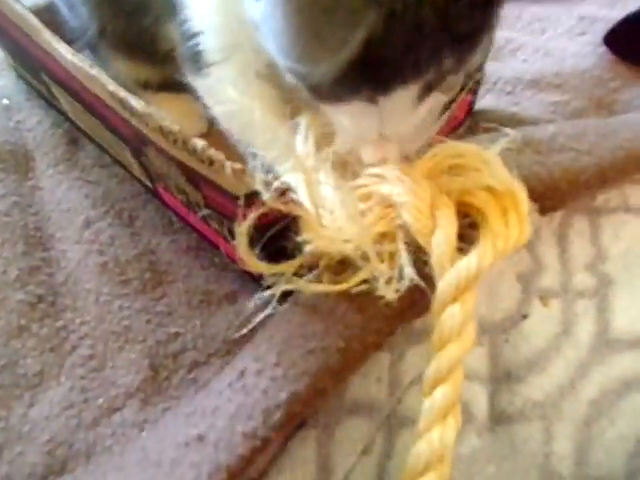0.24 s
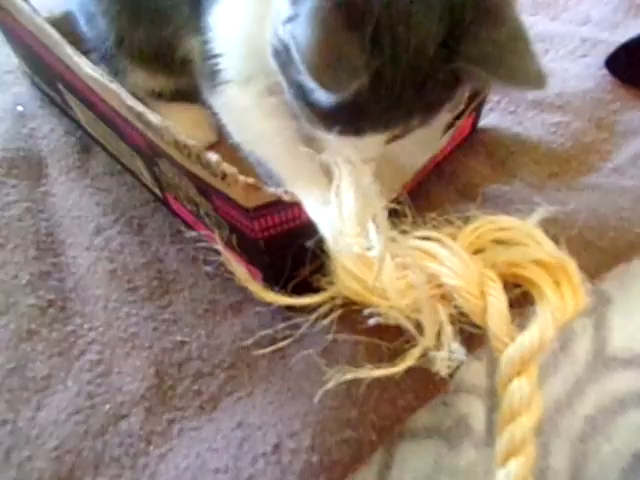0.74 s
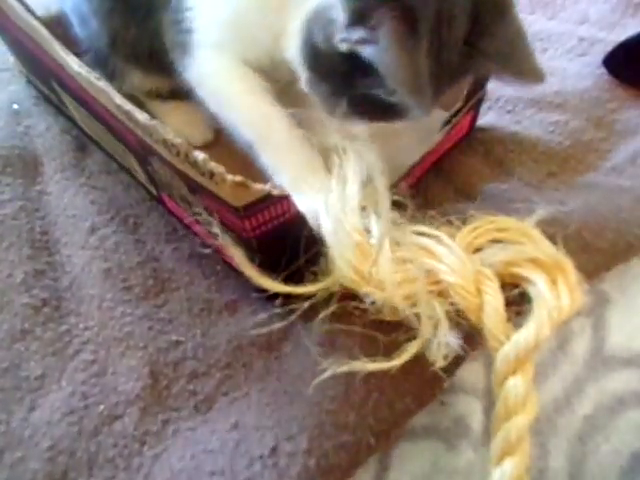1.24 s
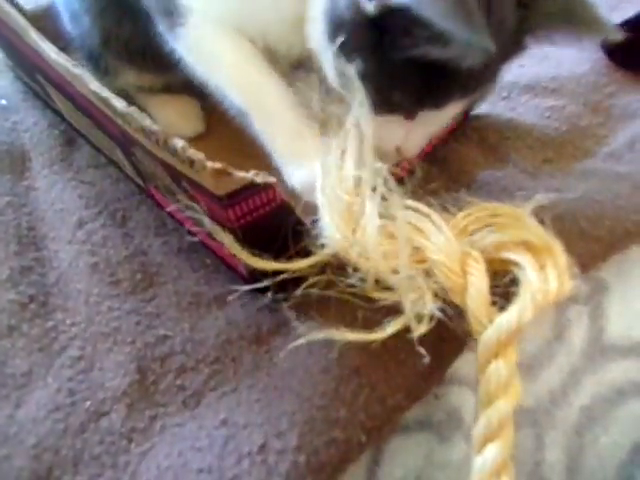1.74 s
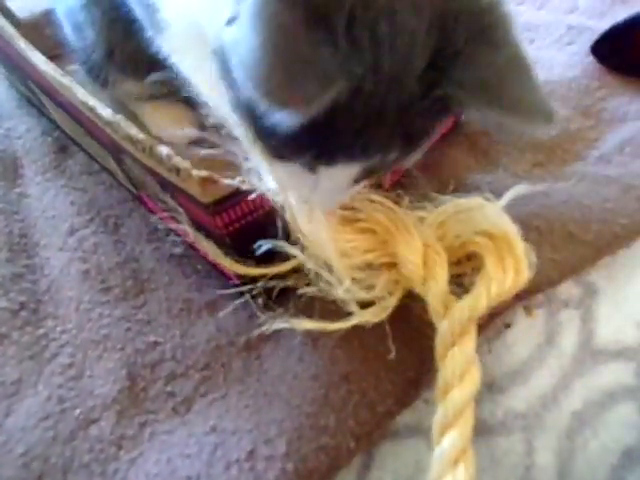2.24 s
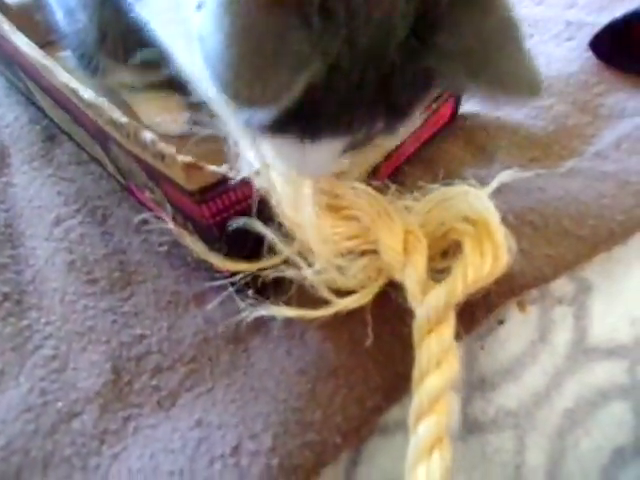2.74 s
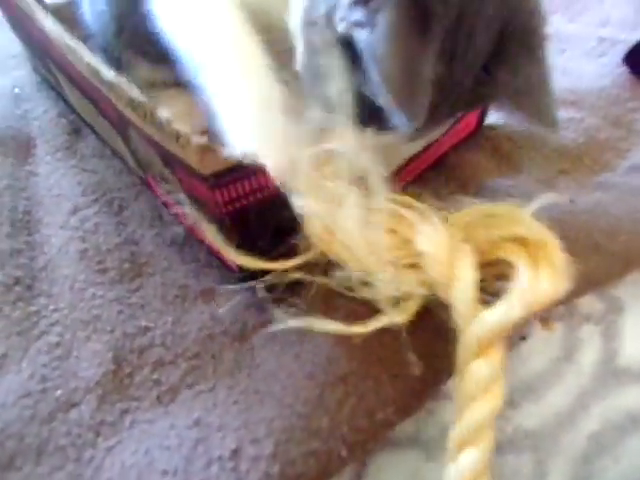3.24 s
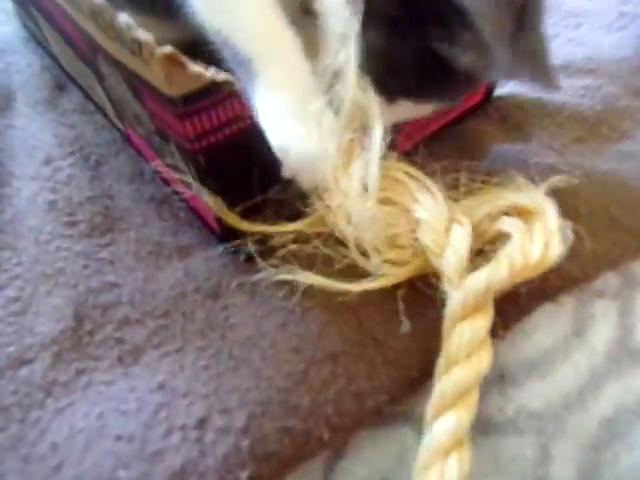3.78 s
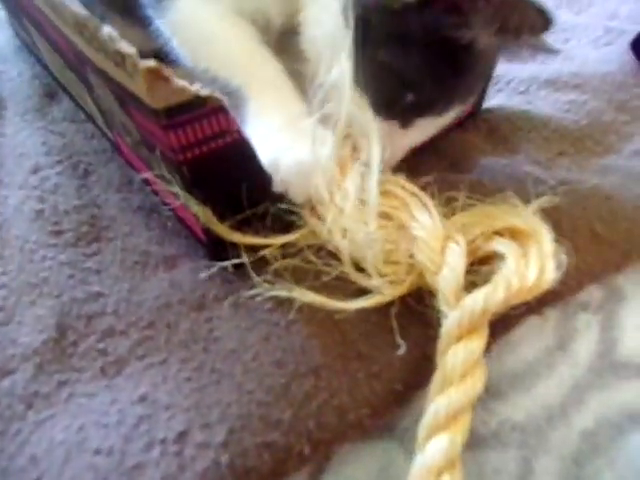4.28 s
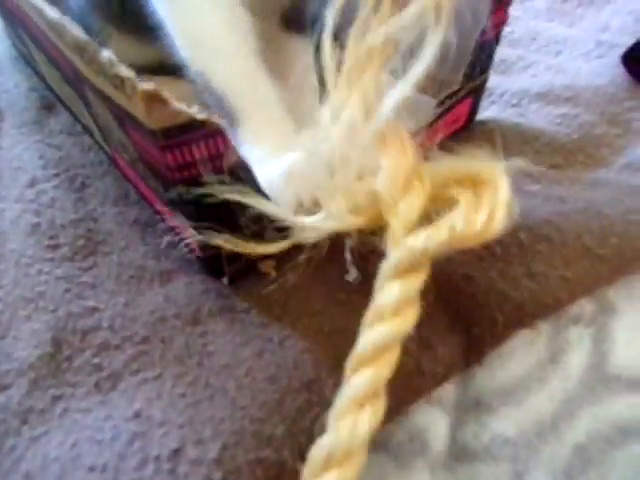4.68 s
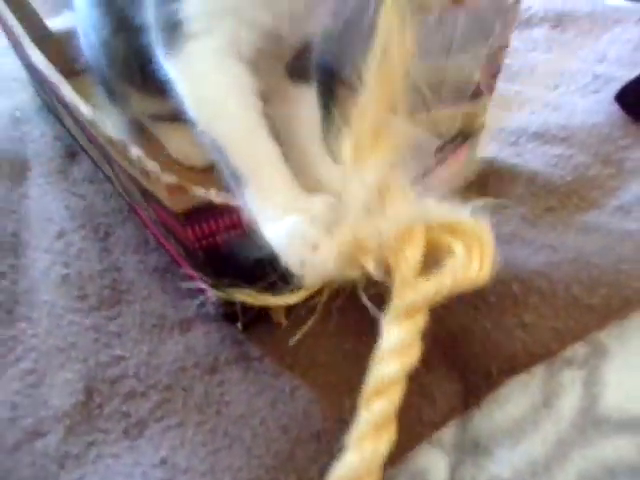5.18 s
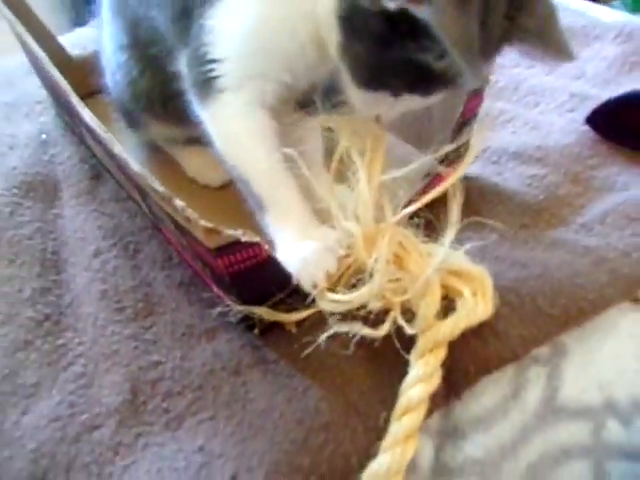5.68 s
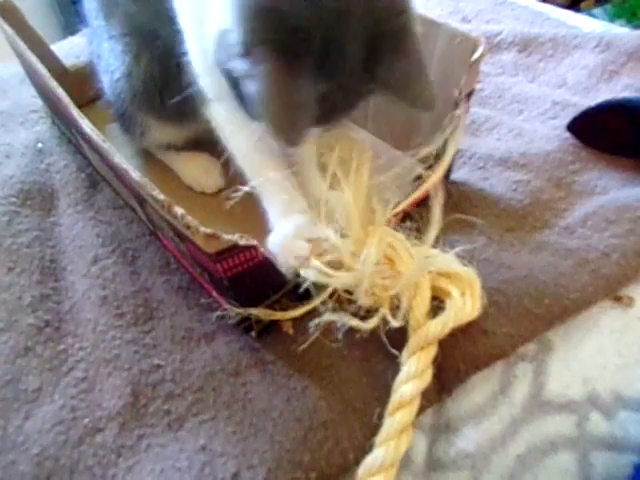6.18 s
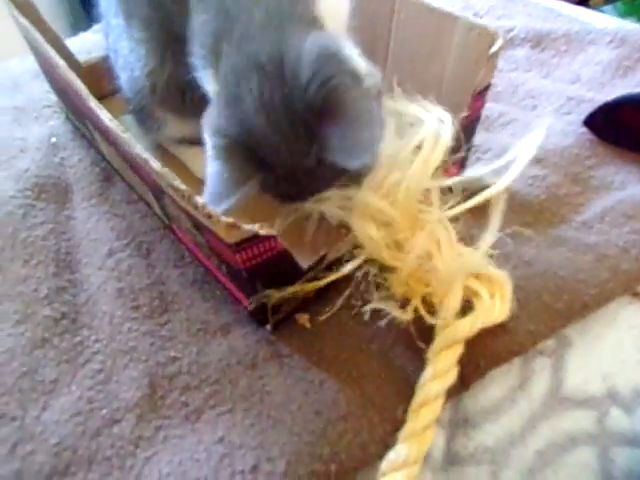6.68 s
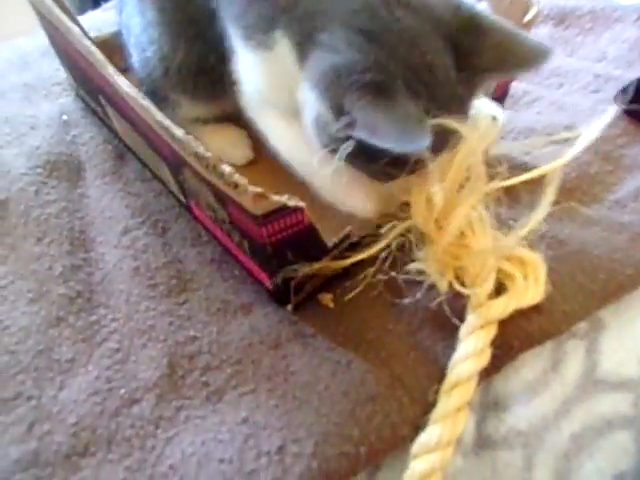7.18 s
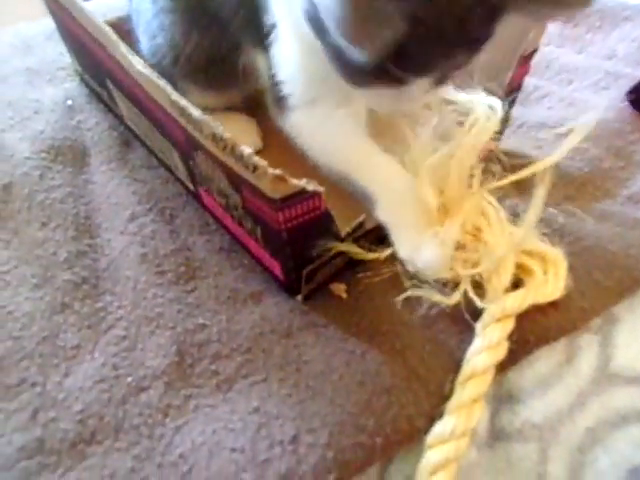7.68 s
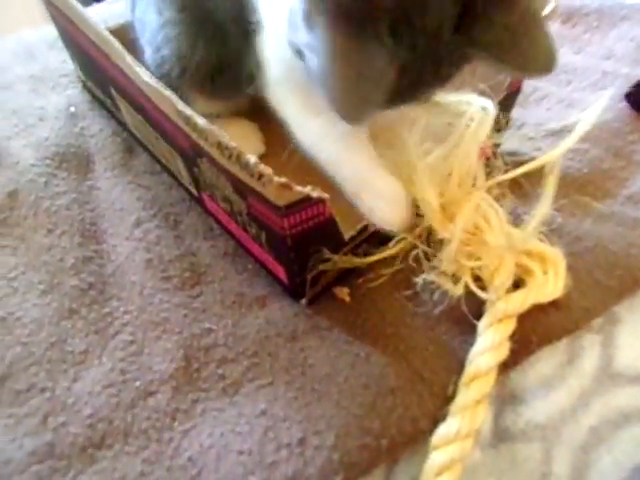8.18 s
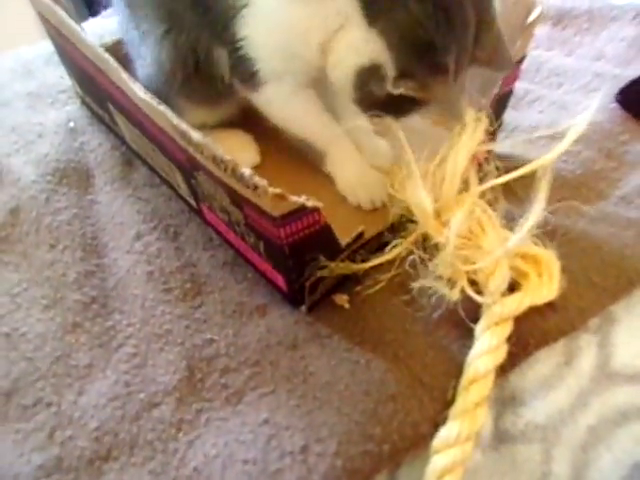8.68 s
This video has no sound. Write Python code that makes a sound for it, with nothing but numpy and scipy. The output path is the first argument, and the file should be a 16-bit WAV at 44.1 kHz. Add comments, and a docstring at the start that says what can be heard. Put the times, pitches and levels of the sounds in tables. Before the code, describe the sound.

A kitten gnaws and claws frayed rope in a cardboard box, dry rustles and crisp snaps over a steady low appliance hum.

```python
"""A kitten chews and claws a frayed plastic rope in a cardboard box, close to a small microphone.
Rope: grainy noise under stroke envelopes, pops and bright snaps; rips rasp through resonances.
Box: claw ticks as damped rings, knocks as a crack plus panel modes, all with a short room tail.
Background: faint thin high tones, a beating appliance hum with two faint tones, coloured air noise."""
import sys
import numpy as np
from scipy import signal
from scipy.fft import rfft, irfft, next_fast_len
from scipy.io import wavfile
from scipy.ndimage import map_coordinates

SR = 44100
rng = np.random.default_rng(int(sys.argv[2]) if len(sys.argv) > 2 else 0)


def wrap_up_sound(samples):
    """Save the sound to the file named by the first command line argument, as 16-bit audio."""
    columns = np.atleast_2d(samples).T
    # keep every value between -1 and 1, then stretch to whole-number steps
    tamed = np.clip(columns, -1, 1)
    steps = np.round(tamed * 32767).astype(np.int16)
    wavfile.write(sys.argv[1], SR, steps)


N = 393797

# Event levels are nominal: snaps, ticks, cracks and thuds add a fixed offset.
# strokes of teeth and paws: peak t/s, rise/s, fall/s (each per 20 dB), fibre level/dB, cardboard level/dB,
# top band re fibre/dB
STROKES = [(0.0, .1, 0.15, -72.5, -65.5, -5.5), (0.32, 0.074, 0.12, -66, -60.5, -13),
           (0.37, .1, 0.082, -65, -72, 2), (0.44, .03, 0.022, -70, -71, 8), (0.58, .02, 0.17, -88, -69, -6),
           (0.87, 0.022, 0.057, -66.5, -66, -8.5), (0.85, .5, 0.39, -75.5, -73, -3),
           (1.2, 0.16, 0.074, -63.5, -66, -6), (1.34, 0.085, 0.1, -63.5, -60, -5),
           (1.539, 0.053, 0.11, -53.5, -55.5, -12.5), (1.75, 0.29, 0.69, -66.5, -69.5, -6),
           (1.79, 0.079, 0.13, -57, -56.5, -9), (1.97, .05, 0.0073, -70, -66.5, -7),
           (2.42, 0.47, 0.05, -67.5, -65, -3), (3.06, 1.6, .1, -73, -72.5, -8),
           (3.13, 0.079, 0.22, -59.5, -62.5, -6), (3.185, 0.26, 0.042, -61.5, -62.5, -3.5),
           (3.29, 0.12, 0.1, -56.5, -57.5, -4.5), (3.358, 0.47, 0.018, -58, -58.5, -3),
           (3.561, 0.1, 0.05, -49.5, -49, -6), (3.63, .1, 0.084, -54, -51, -8),
           (3.69, 0.11, 0.64, -69, -64, -4.5), (3.89, .08, 0.12, -68, -62.5, -1.5),
           (4.11, 0.18, 1, -73.5, -67.5, -1), (4.56, 0.57, 0.049, -60, -63, -4.5),
           (4.62, 0.067, 0.19, -69.5, -71, -9), (4.93, 0.25, 0.24, -64, -66.5, -11),
           (5.12, 0.27, 1, -73.5, -67.5, -8), (5.761, 0.13, 0.23, -71, -67, -12),
           (5.879, 0.045, 0.063, -56.5, -54, -13), (6.01, 0.061, 0.074, -57.5, -56.5, -13),
           (6.1, 0.12, 0.58, -67, -63.5, -6), (6.289, 0.051, 0.092, -49.5, -50.5, -12),
           (6.42, 0.058, 0.12, -64, -78, 4.5), (6.474, 0.057, 0.062, -56, -46, -3),
           (6.54, .06, 0.04, -65.5, -70, 0), (6.61, .2, 0.12, -68.5, -77.5, -0.5),
           (6.7, 0.011, 0.067, -65.5, -70, -0.5), (6.96, 0.13, 0.26, -74, -58.5, -13),
           (7.3, 0.067, 0.057, -62.5, -71, 1.5), (7.81, 0.12, 0.18, -70, -68.5, -3),
           (8.09, 0.14, 1, -78.5, -77, 1), (8.3, 0.056, .03, -72, -62, -9),
           (8.321, 0.0079, 0.14, -65.5, -57.5, -11.5), (8.92, 0.047, .05, -79, -71, -10)]
REST_FIBRE_DB, REST_CARD_DB, REST_TOP_DB = -89, -71, -90.5
ROUNDNESS = 0.88  # exponent: 1 = pointed strokes, 2 = rounded
TOP_BAND_HZ = 11700  # lower edge of the top band
# rubbed-fibre colour: f/Hz, density/dB per Hz
FIBRE_COLOUR = [(1500, -44), (2500, -5), (3200, -2), (4400, -6), (5500, -5), (7400, -8), (8800, -2.5),
                (10200, -13.5), (11500, -13.5), (13500, -13.5), (16000, -14.5)]
# scraped-cardboard colour: f/Hz, density/dB per Hz
CARD_COLOUR = [(300, -4), (700, -2.5), (1400, -4.5), (2400, 1), (3300, -3), (5000, -25)]
# pop colours: f/Hz, width/Hz
POP_BANDS = [(5000, 2200), (9500, 2300), (14000, 5100)]
POPS_PER_S = 41  # in each band
POP_DB, POP_REF_DB = -10.5, -69.5  # pops re rustle, at this fibre gain
POPS_DROWN = 0.35  # exponent: pops grow less than the rustle as strokes strengthen

# fibre snaps: t/s, level/dB, cardboard share/dB
SNAPS = [(0.3431, -50, -10), (0.359, -42.5, -21), (1.155, -48, -2), (1.292, -51.5, 3), (1.503, -53, -6),
         (1.524, -54, -11), (1.5384, -48, -7), (1.548, -41, -4), (1.551, -43, -2), (1.558, -51, 0),
         (1.581, -59, -12), (1.593, -45, -7), (1.783, -43.5, 1), (1.786, -39, -7), (1.796, -57, -6),
         (1.811, -67, -5), (1.827, -55, -12), (1.9704, -43, -4), (2.0936, -54, -13), (2.28, -50, -16),
         (2.372, -54, -5), (2.9811, -52, -10), (3.0979, -49, -10), (3.142, -43, -24), (3.2261, -59, -10),
         (3.497, -43, -15), (3.5284, -34, -25), (3.7664, -48.5, -2), (3.834, -36.5, -35), (3.994, -49, -13),
         (4.011, -37, -42), (4.151, -51, -13), (4.526, -47, -10), (4.856, -52, -13), (4.881, -49, -7),
         (5.224, -43.5, -9), (5.8354, -42, -25), (5.8629, -44, -8), (5.9, -42.5, 1), (6.0993, -46, -3),
         (6.1934, -50, 4.5), (6.2725, -46, 2), (6.282, -40, -10), (6.299, -51, -5), (6.312, -46, -5),
         (6.34, -47, -9), (6.6141, -49.5, -14), (7.437, -57, -16), (8.387, -56, 8), (8.4085, -55, 0),
         (8.4446, -54, -16)]
SNAP_TOP_DB, SNAP_DULLING = 5, 0.593  # top band of a -49.5 dB snap; dB lost per dB of strength
THIN_HZ, THIN_HZ_PER_DB = 2500, 112.5  # lower edge of a snap; rises as the cardboard share falls

# claw ticks on cardboard: t/s, level/dB, f/Hz
TICKS = [(3.24, -48.5, 630), (3.5752, -36, 2200), (3.6004, -19.5, 1784), (6.4297, -33.5, 2600),
         (4.464, -44, 2450), (5.2427, -42.5, 3430), (5.244, -46, 2500), (6.0106, -31, 3270),
         (6.443, -24, 2620), (6.5077, -41.5, 2090), (6.5314, -41, 2100), (6.703, -41.5, 2620),
         (6.7148, -45, 2310), (6.916, -46, 2420), (6.9354, -43, 2720), (6.943, -45.5, 2700),
         (6.947, -50, 1350), (6.9568, -38.5, 2800), (6.958, -44, 2050), (6.976, -44, 2780),
         (6.998, -39, 2500), (7.0204, -44, 2550), (7.026, -46, 2500), (7.0308, -45.5, 2600),
         (7.041, -51.5, 2500), (7.0718, -53.5, 2270), (8.326, -45, 2640), (8.562, -38, 3330)]
TICK_CYCLES, TICK_SAG = 28, .006  # cycles per 60 dB fade; share of pitch lost per cycle
# a dragged claw chatters in small ticks; level and pitch are centres
SCRAPE_START_S, SCRAPE_END_S, SCRAPE_DB, SCRAPE_HZ = 6.93, 7.05, -55, 2500

# short rips, and at 6.934 s a dragged claw's rasp: t/s, level/dB, length/s, treble/dB, level change over the
# length/dB, # resonances of the torn part or scraped cardboard (f/Hz, width/Hz, level/dB)
RIPS = [(6.4335, -36, .021, -15.5, 0, [(930, 700, -9), (1890, 110, -8.5), (2540, 210, 2), (2780, 230, -16),
        (3980, 160, -10), (6770, 280, -12)]), (7.797, -70, .058, -14, -3, [(5080, 300, 0),
        (5800, 700, -3)]), (8.5595, -40, 0.043, -37, -6, [(656, 250, -12), (1100, 210, -7), (2420, 170, -4),
        (2800, 390, 7), (3330, 300, 6.5), (3850, 350, 1)]), (3.262, -63.5, 0.066, -30, 2, [(5300, 350, 0)]),
        (6.934, -60, .05, -30, -1, [(2780, 300, 0)]), (6.508, -51.5, 0.012, -23.5, -2, [(1210, 350, -1),
        (2130, 240, 0)])]
RIP_CYCLES, RIP_FADE_MIN_HZ = 150, 2500  # cycles per 60 dB fade, counted at this f or higher

# knocks on the box: t/s, crack/dB, body/dB, boom/dB
KNOCKS = [(0.57, -49, -59, -56), (1.539, -59.5, -64, -59), (3.229, -66, -67, -51), (3.255, -68, -61, -50.5),
          (3.5737, -22.5, -64, -42), (3.598, -7, -25, -33.5), (3.606, -23, -43, -54),
          (6.011, -47, -47.5, -48), (6.281, -62, -53, -56), (6.428, -37, -48, -48.5), (6.52, -61, -55, -56),
          (6.715, -68, -53.5, -55), (6.949, -62.5, -58, -59), (8.326, -39.5, -60, -65),
          (8.573, -58, -51, -76)]
# box panel modes: f/Hz, level/dB, t60/s
BOX_MODES = [(95, -19, 0.051), (135, -11, 0.18), (278.4, 5.5, 0.059), (356, -8, 0.18), (413, 2, 0.057),
             (494, -6, 0.055), (645, 3, 0.042), (763, 1.5, 0.043), (1000, -5.5, 0.08), (1124, -6.5, 0.073),
             (1272, -5.5, 0.084), (1376, -7.5, 0.048), (1660, -5.5, 0.038), (1776, -2.5, 0.032)]
BODY_LAG_S = .002  # panels ring just after the crack
# room echo decay: f/Hz, t60/s
ROOM_DECAY = [(200, 0.087), (1500, 0.23), (3500, 0.15), (8000, 0.12)]

# faint thin high tones: start t/s, end t/s, f/Hz, level/dB
THIN_TONES = [(0.0, 2.3, 6680, -90), (8.19, 8.33, 12850, -82), (8.21, 8.32, 8520, -86)]
# moments when hum and neighbour cancel most: t/s
BEAT_LOWS_S = [-0.35, 0.72, 1.85, 3.15, 4.19, 4.97, 6.05, 7.22, 8.17, 9.05]
HUM_HZ, HUM_DB, NEIGHBOUR_DB = 171.18, -49.5, -15  # neighbour level re hum
FLUTTER_HZ, FLUTTER_DB = 8.9, 0.36  # slight tremble of the hum
# fainter steady tones: f/Hz, level/dB, wander/Hz
TONES = [(340, -75.5, 0.58), (573.7, -71.5, 2.29)]
# room air and microphone hiss colour: f/Hz, density/dB per Hz
AIR_COLOUR = [(20, -21.5), (55, -1.5), (140, 1), (300, -2), (480, -11), (590, -6.5), (900, -10.5),
              (2600, -19.5), (4000, -16), (7000, -30.5), (10400, -58.5), (13000, -32), (15500, -26)]
AIR_DB = -63.5

# narrow dips in the microphone response: f/Hz, width/Hz, depth (0-1)
MIC_DIPS = [(3682, 150, .93), (4371, 220, .93), (8025, 600, .97), (11725, 700, .97), (16190, 500, .9)]
MIC_TOP_HZ = 15830


def rubbing():
    """Fibres slip over each other in grains and small pops; paws drag on the cardboard."""
    fibre_gain, card_gain, top_gain = strokes()
    rustle = unit(crackle(grain_db=3.0, rate=420, spikes=1.2) * amp(0.82 * wobble(36)))
    all_pops = unit(sum(pops(hz, width_hz) for hz, width_hz in POP_BANDS))
    pop_gain = amp(POP_DB) * (amp(POP_REF_DB) / fibre_gain) ** POPS_DROWN
    fibres = coloured(rustle + pop_gain * all_pops, FIBRE_COLOUR)
    top = filtered(fibres, lambda hz: hz > TOP_BAND_HZ)
    drag = unit(coloured(crackle(grain_db=1.5, rate=130, spikes=0.62), CARD_COLOUR))
    return fibre_gain * unit(fibres - top) + top_gain * unit(top) + card_gain * drag


def strokes():
    """Fibre, cardboard and top-band gains: stroke powers add to the resting level."""
    t = np.arange(0, N + 64, 64) / SR  # control rate: every 64 samples
    power = amp([[REST_FIBRE_DB], [REST_CARD_DB], [REST_TOP_DB]]) ** 2
    for peak_s, rise_s, fall_s, fibre_db, card_db, top_db in STROKES:
        distance = np.maximum((peak_s - t) / rise_s, (t - peak_s) / fall_s)
        shape_db = -20 * distance ** ROUNDNESS
        power = power + amp(shape_db + np.c_[[fibre_db, card_db, fibre_db + top_db]]) ** 2
    return [np.interp(np.arange(N) / SR, t, np.sqrt(p)) for p in power]


def crackle(grain_db, rate, spikes):
    """Noise whose level varies in short grains, with scattered single clicks."""
    clicks = (rng.random(N) < 250 / SR) * rng.exponential(spikes, N)
    grains = amp(grain_db * wobble(rate)) + signal.lfilter([1], [1, -.96], clicks)
    return grains * rng.standard_normal(N)


def pops(hz, width_hz):
    """Sparse tiny clicks of uneven size, in one band."""
    clicks = (rng.random(N) < POPS_PER_S / SR) * amp(16 * rng.random(N))
    bursts = signal.lfilter([1], [1, -.95], clicks) * rng.standard_normal(N)
    return band(bursts, hz, width_hz)


def snaps():
    """A fibre lets go: bright click plus cardboard tap; strong snaps are duller, free ones thinner."""
    out = np.zeros(N)
    lead = 100  # samples of room for the zero-phase filters
    for s, db, card_db in SNAPS:
        click, tap = np.pad([puff(0.012), puff(0.0098)], [(0, 0), (lead, 0)])
        top_db = SNAP_TOP_DB - SNAP_DULLING * (db + 49.5)
        edge_hz = THIN_HZ - THIN_HZ_PER_DB * card_db
        click = filtered(click, lambda hz: 1 / (1 + (edge_hz / (hz + 1)) ** 4))
        sound = brighter(click, top_db) + amp(card_db) * coloured(tap, CARD_COLOUR)
        add(out, s - lead / SR, amp(db + 6.0) * sound)
    return out


def brighter(x, top_db):
    """Fibre colour, with its top band at a gain of its own."""
    x = coloured(x, FIBRE_COLOUR)
    top = filtered(x, lambda hz: 1 / (1 + (TOP_BAND_HZ / (hz + 1)) ** 12))
    return x + (amp(top_db) - 1) * top


def ticks():
    """A claw plucks the cardboard: a short damped ring, sagging in pitch, with a weak bright edge."""
    out, t = np.zeros(N), np.arange(SR // 10) / SR
    chatter = [(np.interp(a, [0, 1], [SCRAPE_START_S, SCRAPE_END_S]),
                SCRAPE_DB + 6 * (b - .5), SCRAPE_HZ + 1100 * (c - .5))
               for a, b, c in rng.random((22, 3))]
    for s, db, hz in TICKS + chatter:
        phase = 2 * np.pi * (1 - np.exp(-TICK_SAG * hz * t)) / TICK_SAG
        envelope = amp(-60 * t * hz / TICK_CYCLES) * (1 - np.exp(-t / 0.000663))
        ring = np.sin(phase) * envelope + 0.74 * band(puff(0.01), hz, width_hz=0.36 * hz)
        add(out, s, amp(db + 4.5) * (ring + 0.03 * puff(0.0062)))
    return out


def rips():
    """A tear or a claw's rasp starts at once, rings through its resonances and dies, treble first."""
    out, t = np.zeros(N), np.arange(SR // 4) / SR
    for s, db, length_s, treble_db, change_db, peaks in RIPS:
        grain = np.repeat(rng.standard_normal(len(t) // 49 + 1), 49)[:len(t)]  # held 49 samples
        rasp = rng.standard_normal((2, len(t))) * amp(1.5 * grain)
        after_s = np.maximum(t - length_s, 0)
        tone = np.zeros(len(t))
        for hz, width_hz, level_db in peaks:
            fade_db = -60 * after_s * max(hz, RIP_FADE_MIN_HZ) / RIP_CYCLES
            resonance = band(band(rasp[0], hz, width_hz), hz, 4.1 * width_hz)
            tone += amp(level_db + fade_db) * unit(resonance)
        tone /= np.linalg.norm(amp([p[2] for p in peaks]))
        hiss = amp(treble_db - 60 * after_s / 0.012) * unit(coloured(rasp[1], FIBRE_COLOUR))
        add(out, s, amp(db + change_db * np.minimum(t / length_s, 1)) * (tone + hiss))
    return out


def knocks():
    """A sharp crack, then the panels' upper modes (body) and lower modes (boom)."""
    cracks, panels, t = np.zeros(N), np.zeros(N), np.arange(SR // 3) / SR
    for s, crack_db, body_db, boom_db in KNOCKS:
        blow = puff(0.00434) + 5 * (np.arange(SR // 10) == 0)  # noise plus one impulse
        crack = band(band(blow, 1900, width_hz=1900), 3600, width_hz=3800)
        for db, hz, width_hz in [(-9.5, 4700, 1600), (-16, 6600, 2350), (-20.5, 13700, 4700)]:
            crack = crack + amp(db) * band(blow, hz, width_hz)
        add(cracks, s, amp(crack_db + 3.5) * crack)
        thud = band(band(puff(0.0664), 1700, width_hz=2160), 1500, width_hz=2100)
        add(panels, s + BODY_LAG_S, amp(body_db + 9.5) * thud)
        for hz, db, t60 in BOX_MODES:
            mode_db = (boom_db if hz < 450 else body_db) + db + rng.normal(0, 1.5)
            ring = np.sin(2 * np.pi * hz * rng.normal(1, 0.009) * t)
            add(panels, s + BODY_LAG_S, amp(mode_db - 60 * t / t60) * ring * (1 - np.exp(-t / 0.0014)))
    return panels + np.roll(bent(cracks, lag_s=0.0041), -45)  # cracks 45 samples earlier


def bent(x, lag_s):
    """Bending waves in a panel: low frequencies travel slower and arrive later."""
    return filtered(x, lambda hz: np.exp(-4j * np.pi * lag_s * np.sqrt(1000 * hz)))


def room(x):
    """Noise-tail echo; each frequency dies at its own speed."""
    hz, t, z = signal.stft(rng.standard_normal(SR // 2), SR, nperseg=256)
    decay = amp(-60 * t / along(ROOM_DECAY, hz)[:, None])
    tail = signal.istft(z * decay, SR, nperseg=256)[1]
    return signal.fftconvolve(np.pad(x, (200, 0)), tail / np.linalg.norm(tail))[:N]


def thin_tones():
    """Faint high tones, wavering in pitch and level, that come and go softly."""
    t, out = np.arange(N) / SR, np.zeros(N)
    for start_s, end_s, hz, db in THIN_TONES:
        gate = np.clip(np.minimum(t - start_s, end_s - t) / .015, 0, 1)
        phase = 2 * np.pi * np.cumsum(hz + 25 * wobble(40)) / SR
        out += amp(db + 3.4 * wobble(30)) * gate * np.sin(phase)
    return out


def appliance():
    """A nearly pure hum beats with a weaker neighbour just below; two faint tones lie above."""
    t = np.arange(N) / SR
    phase = 2 * np.pi * HUM_HZ * t + .12 * wobble(0.88)
    beat = 2 * np.pi * np.interp(t, BEAT_LOWS_S, np.arange(len(BEAT_LOWS_S)))
    flutter_db = FLUTTER_DB * np.sin(2 * np.pi * FLUTTER_HZ * t)
    level = np.sqrt(2) * amp(HUM_DB + 0.18 * wobble(8.8) + flutter_db)
    out = level * (np.sin(phase) - amp(NEIGHBOUR_DB) * np.sin(phase - beat))
    for hz, db, wander_hz in TONES:
        tone_phase = 2 * np.pi * np.cumsum(hz + wander_hz * wobble(12)) / SR
        out = out + amp(db + 1.5 * wobble(12)) * np.sin(tone_phase)
    return out


def air():
    """Steady coloured noise with a slight flutter."""
    return amp(AIR_DB + 0.75 * wobble(3.9)) * unit(coloured(rng.standard_normal(N), AIR_COLOUR))


def amp(db):
    """dB to linear gain."""
    return 10 ** (np.asarray(db) / 20)


def unit(x):
    """Scale to unit RMS."""
    return x / np.sqrt(np.mean(x ** 2) + 1e-20)


def along(points, hz):
    """Interpolate (f/Hz, value) points on a log frequency axis."""
    f, v = np.transpose(points)
    return np.interp(np.log(hz + 1), np.log(f + 1), v)


def wobble(rate):
    """A smooth random curve, rate knots per second."""
    knots = rng.standard_normal(int(N * rate / SR) + 4)
    return map_coordinates(knots, [np.arange(N) * rate / SR])


def filtered(x, response):
    """x times a complex response of frequency."""
    m = next_fast_len(len(x) + 4096)
    return irfft(rfft(x, m) * response(np.fft.rfftfreq(m, 1 / SR)), m)[:len(x)]


def coloured(x, spectrum):
    """Zero-phase filter with a tabulated spectrum."""
    return filtered(x, lambda hz: amp(along(spectrum, hz)))


def band(x, hz, width_hz):
    """One causal resonance."""
    return filtered(x, lambda f: 1j * f * width_hz / (hz * hz - f * f + 1j * f * width_hz))


def add(track, s, sound):
    """Mix a sound into the track at s seconds."""
    part = track[round(s * SR):][:len(sound)]
    part += sound[:len(part)]


def puff(t60):
    """A decaying noise burst; its energy is set by t60 alone."""
    fall = amp(-60 * np.arange(SR // 10) / SR / t60)
    burst = rng.standard_normal(len(fall)) * fall
    return burst * np.linalg.norm(fall) / np.linalg.norm(burst)


def scene():
    """Rope and box events with room echo, over rubbing and background."""
    hits = snaps() + ticks() + rips() + knocks()
    hits = hits + amp(-10.5) * room(band(hits, 1500, width_hz=5500))
    # small objects radiate no deep bass
    hits = filtered(hits, lambda hz: 1 / (1 + (75 / (hz + 1)) ** 6))
    return (hits + rubbing() + thin_tones() + appliance() + air())[None]


def record(dry):
    """The microphone's narrow dips, then its band limit."""
    def dips(f):
        notches = [1 - np.clip(d, 0, 1) / (1 + 2j * (f - hz) / w) for hz, w, d in MIC_DIPS]
        return np.prod(notches, axis=0)
    return filtered(dry[0], lambda hz: dips(hz) * (hz < MIC_TOP_HZ))[None]


dry = scene()
out = record(dry)
wrap_up_sound(out)
```